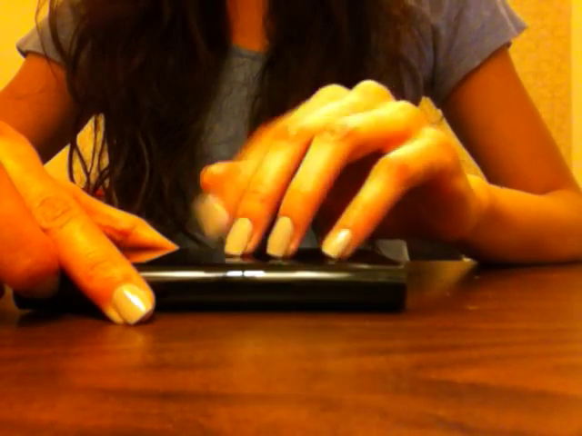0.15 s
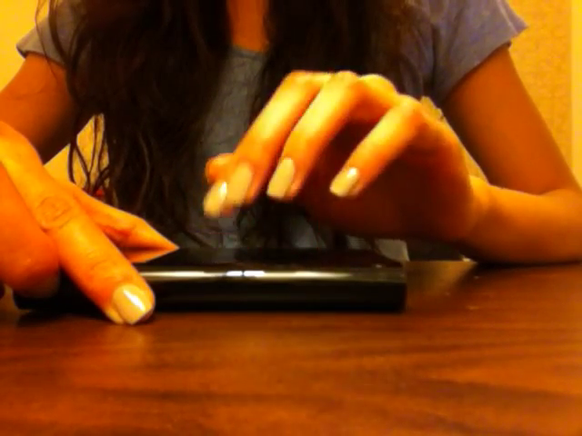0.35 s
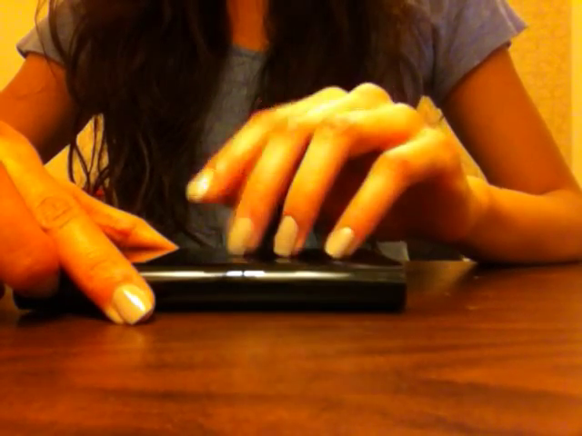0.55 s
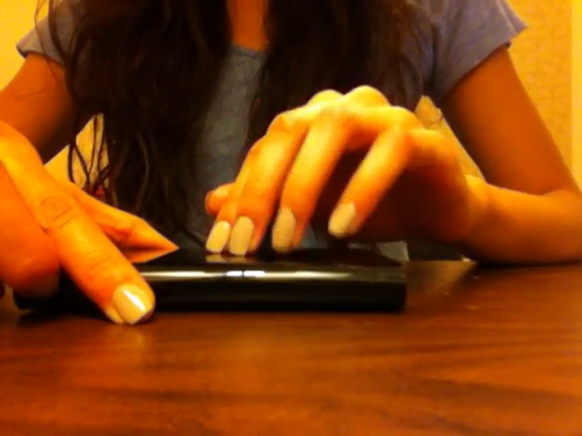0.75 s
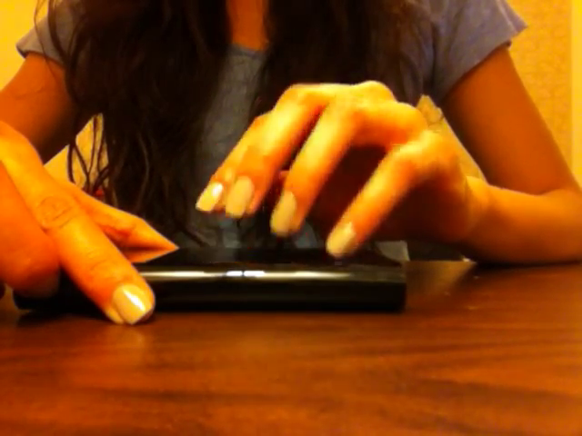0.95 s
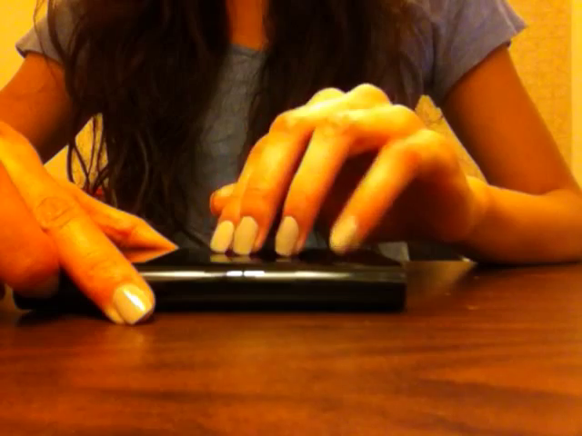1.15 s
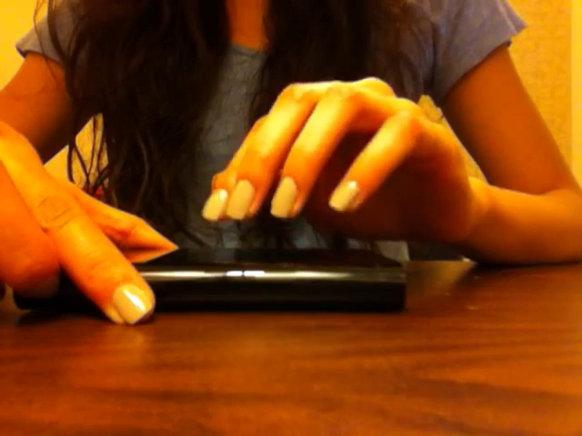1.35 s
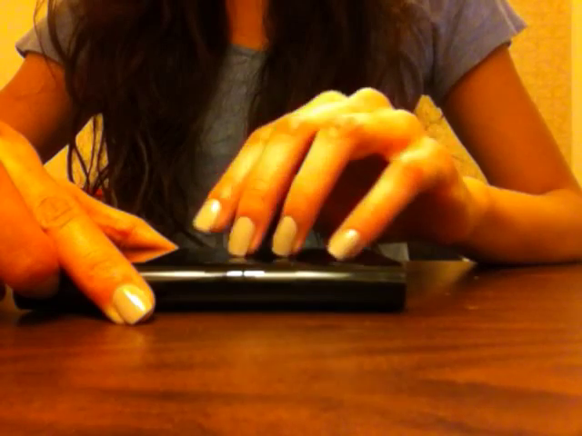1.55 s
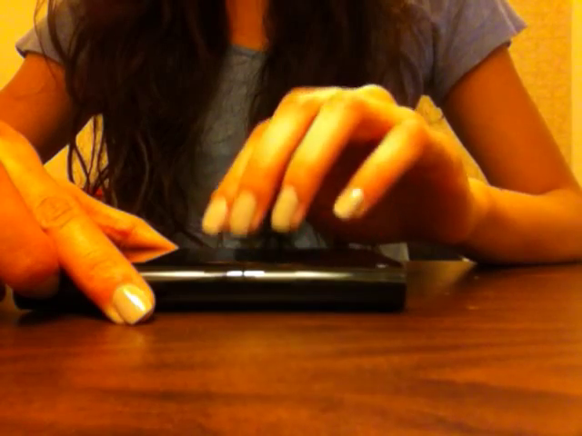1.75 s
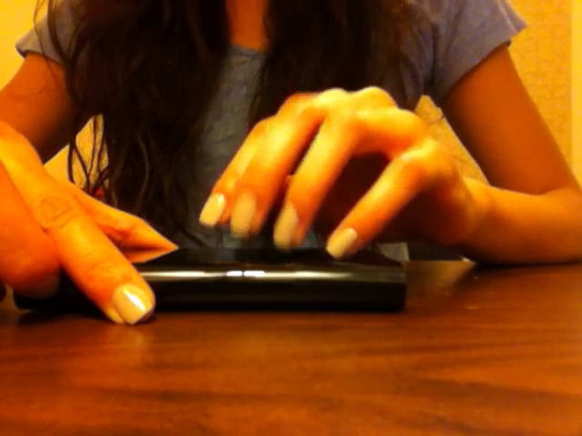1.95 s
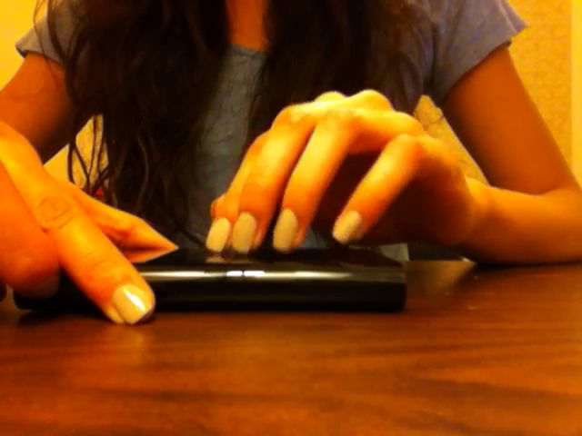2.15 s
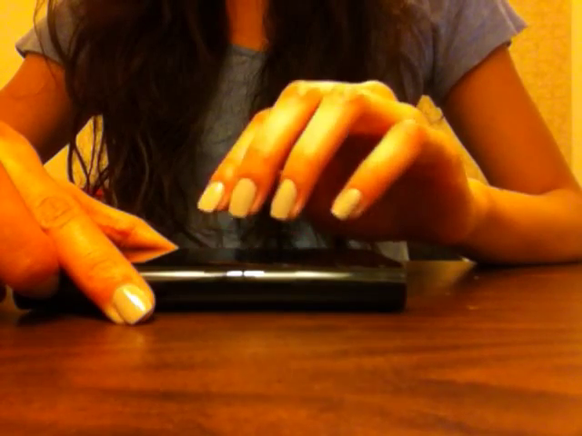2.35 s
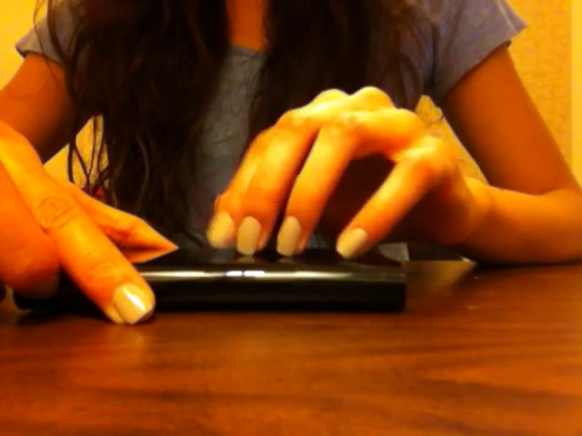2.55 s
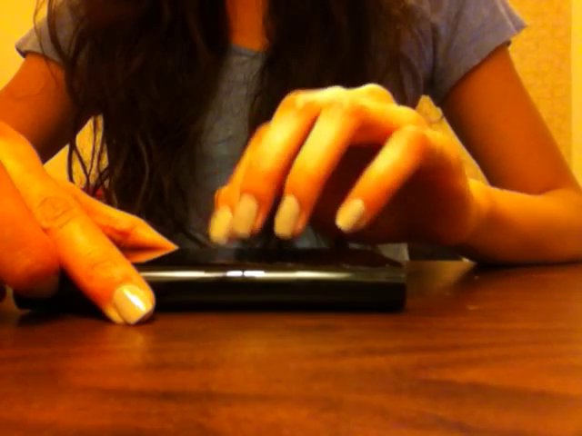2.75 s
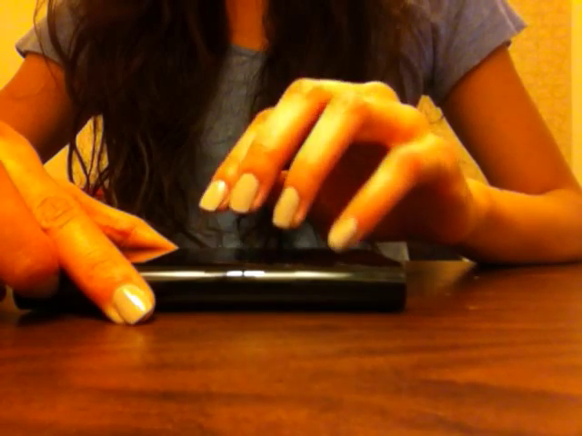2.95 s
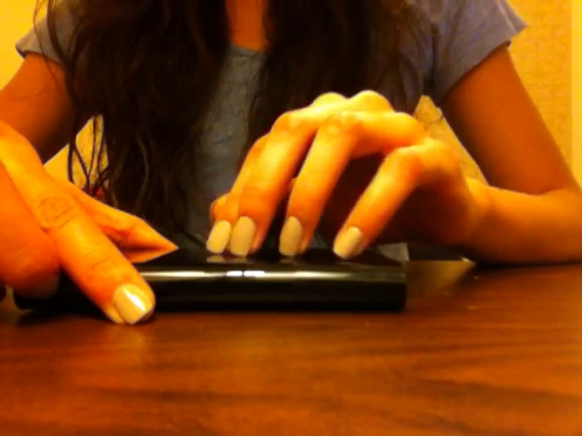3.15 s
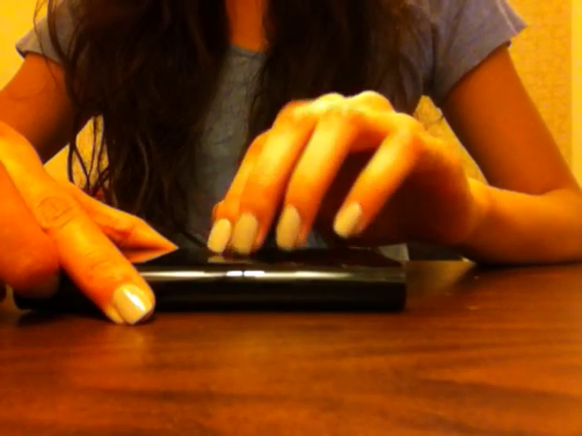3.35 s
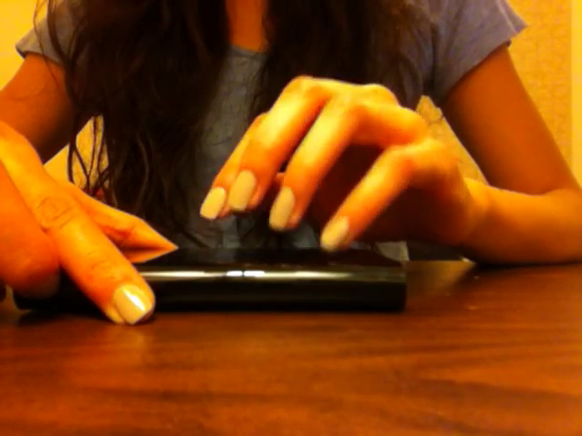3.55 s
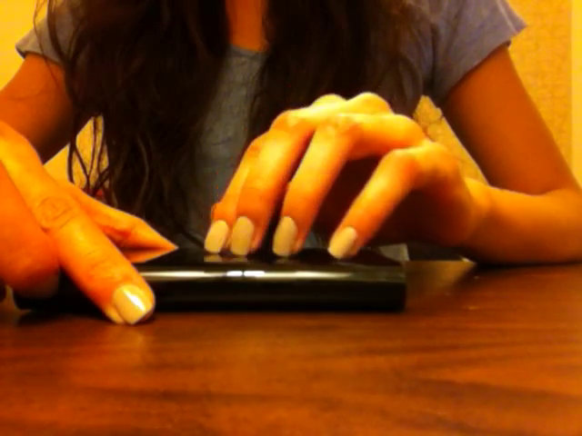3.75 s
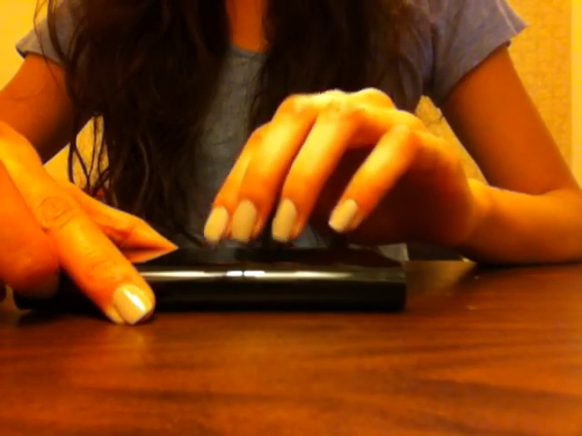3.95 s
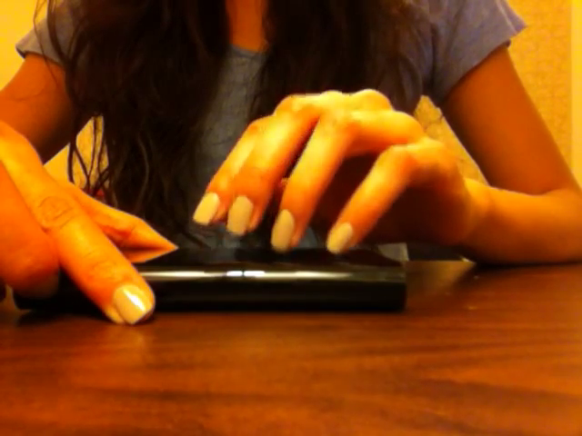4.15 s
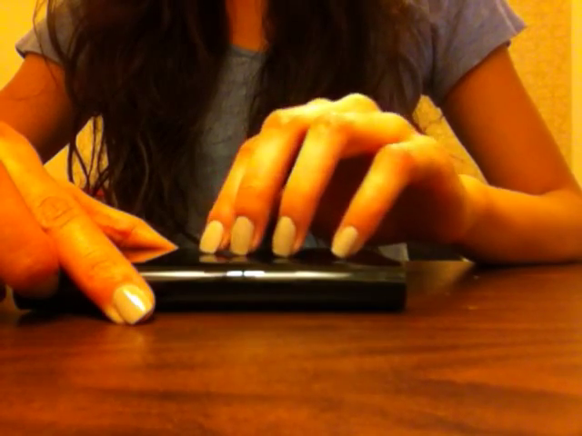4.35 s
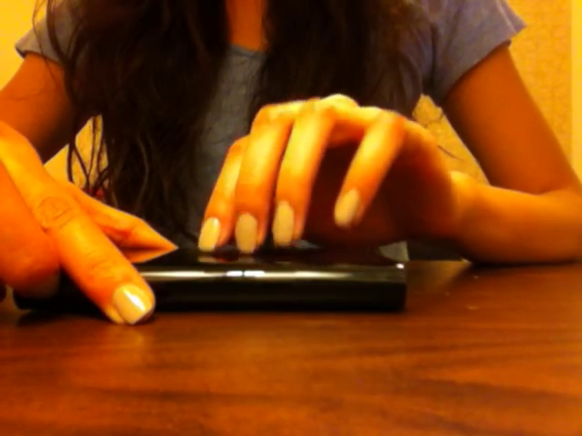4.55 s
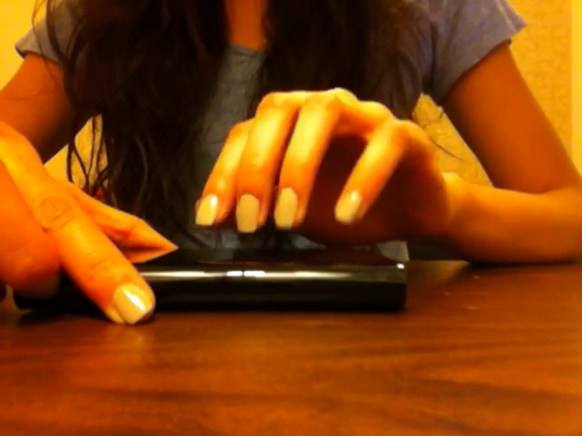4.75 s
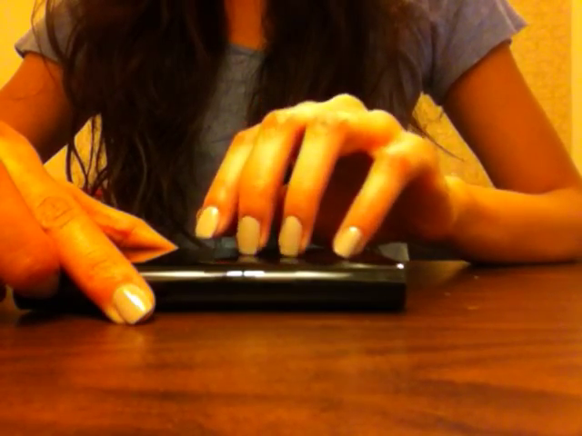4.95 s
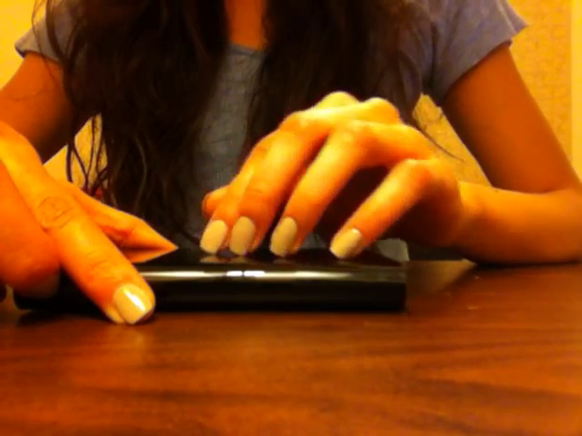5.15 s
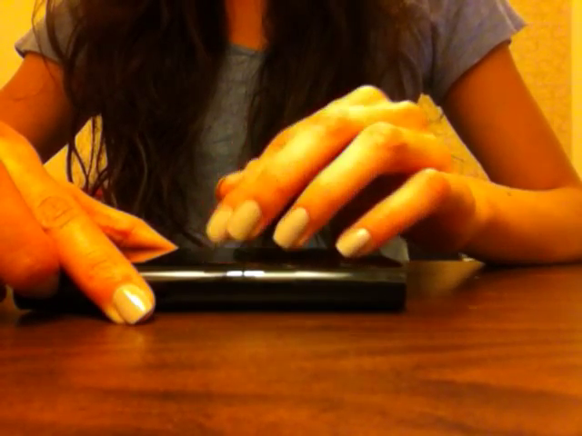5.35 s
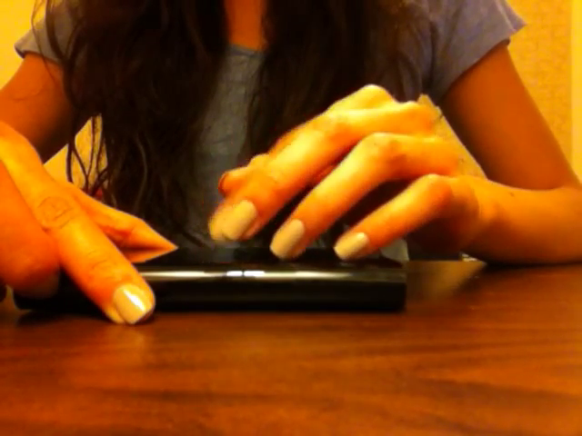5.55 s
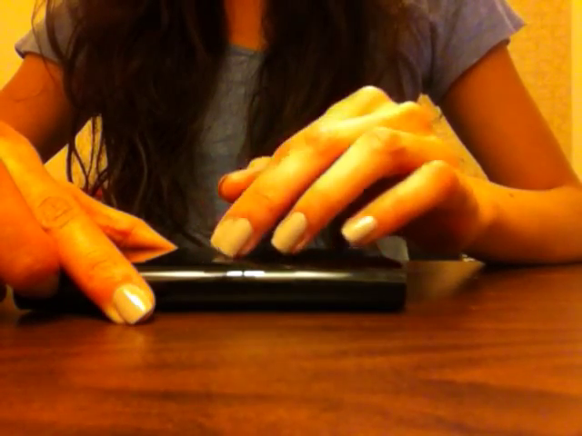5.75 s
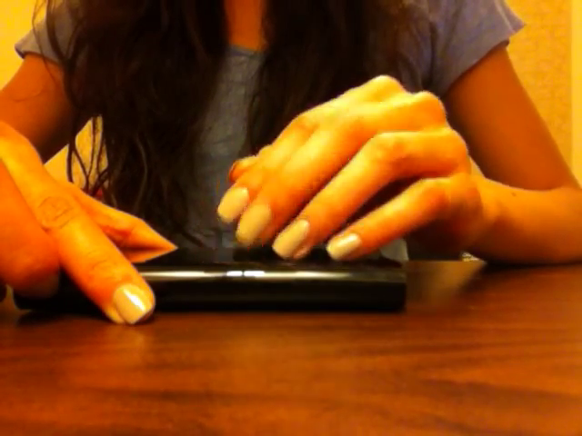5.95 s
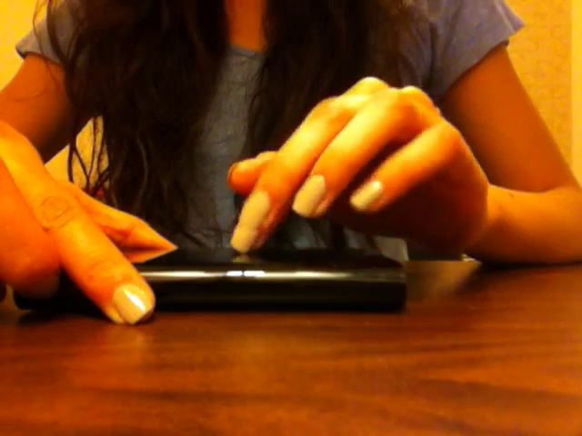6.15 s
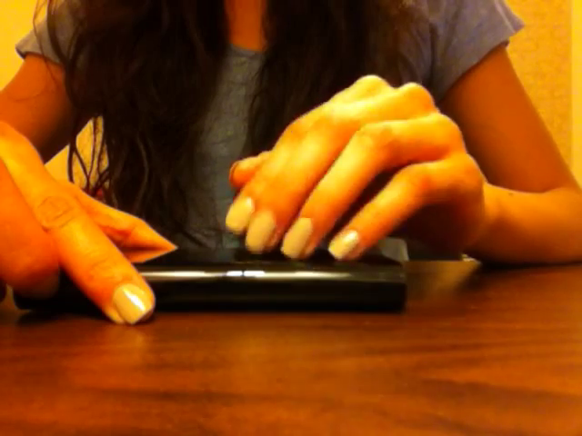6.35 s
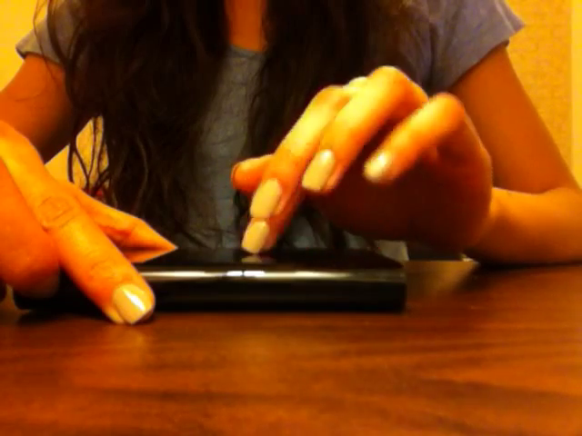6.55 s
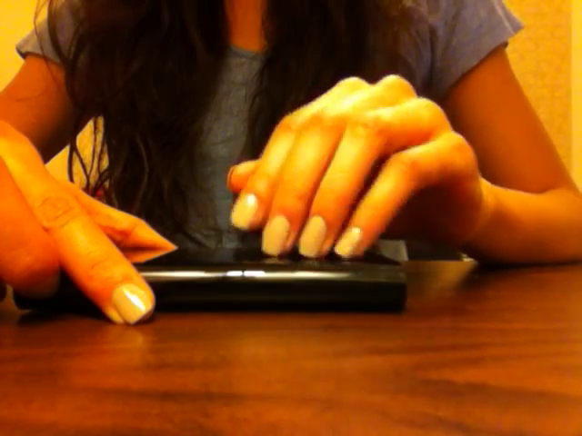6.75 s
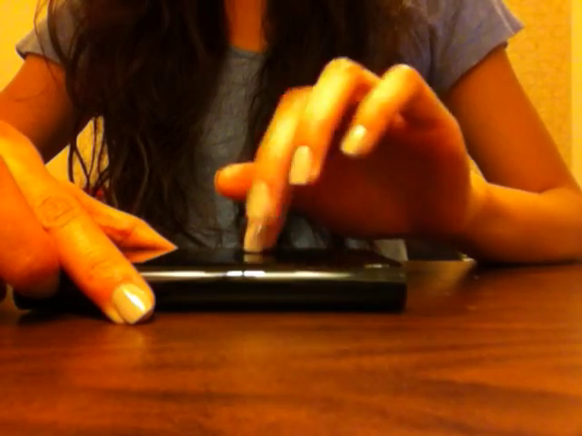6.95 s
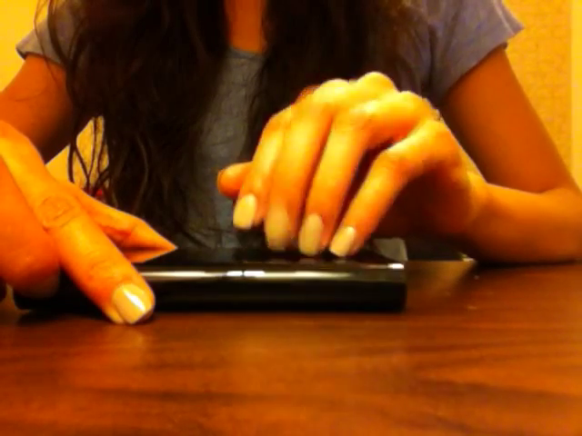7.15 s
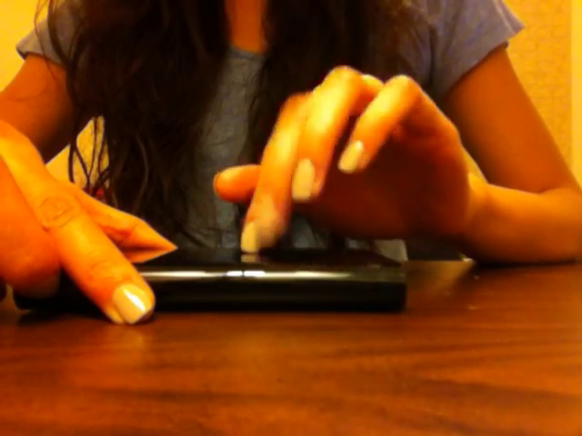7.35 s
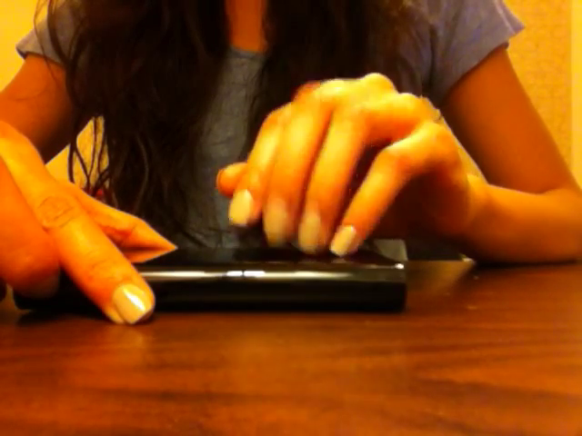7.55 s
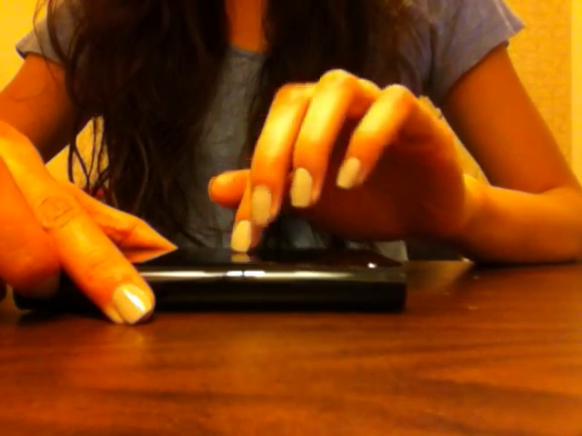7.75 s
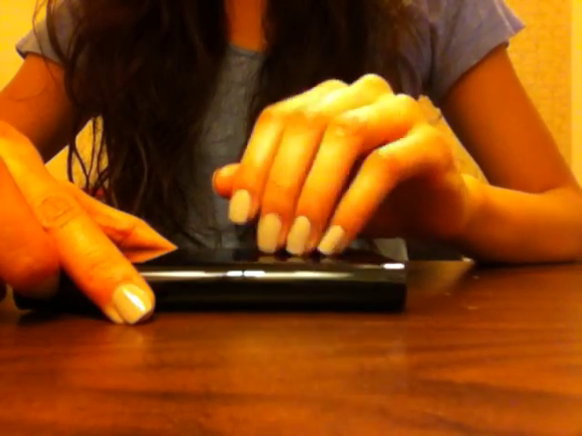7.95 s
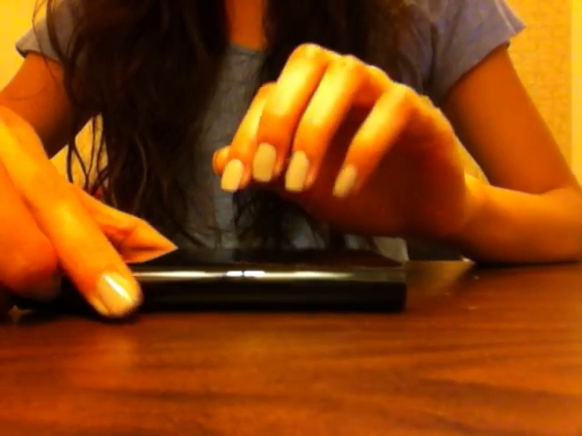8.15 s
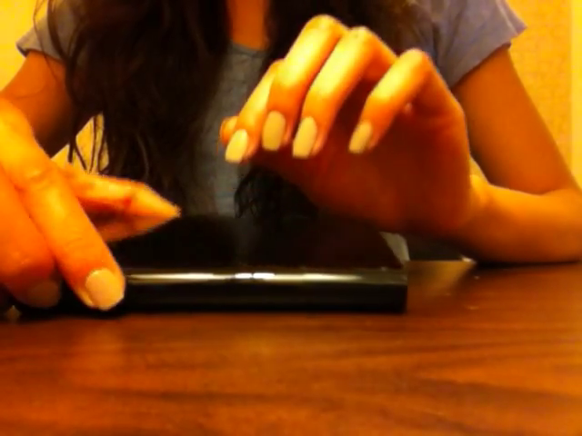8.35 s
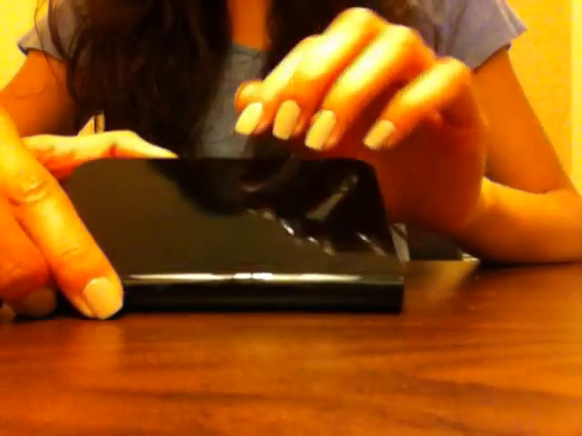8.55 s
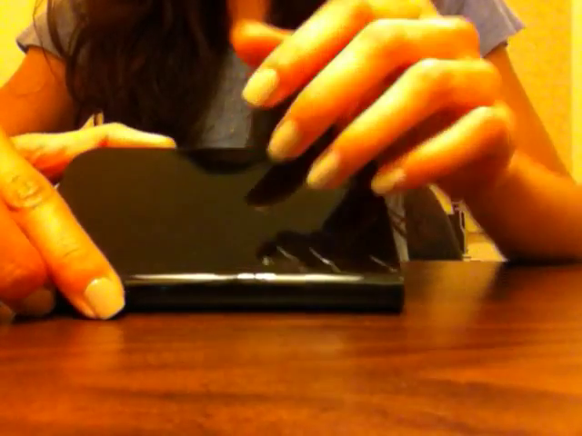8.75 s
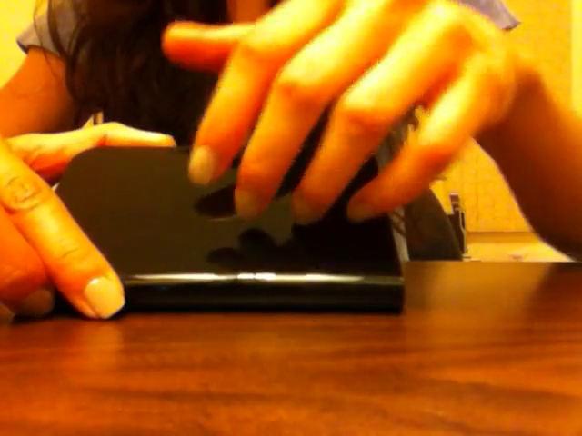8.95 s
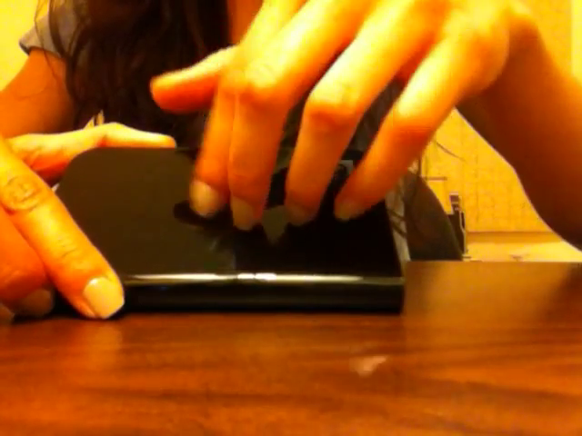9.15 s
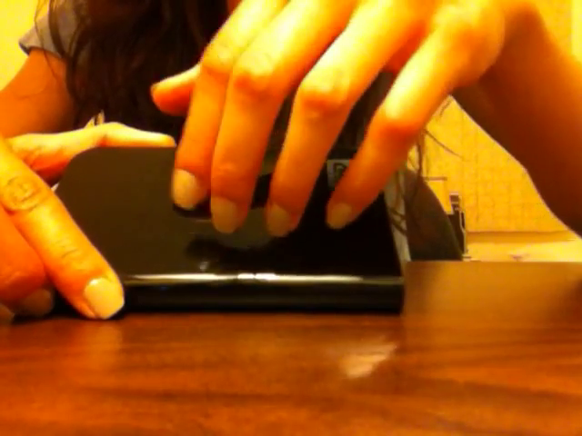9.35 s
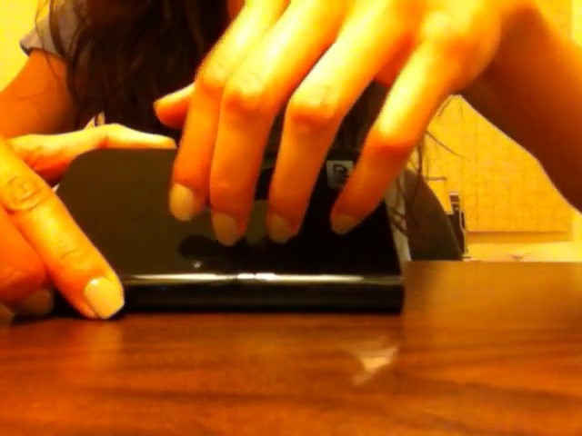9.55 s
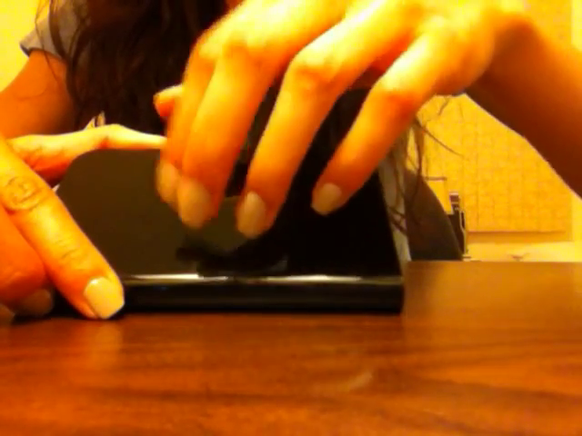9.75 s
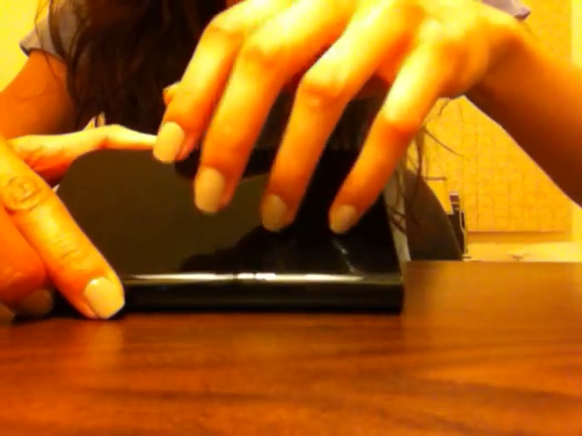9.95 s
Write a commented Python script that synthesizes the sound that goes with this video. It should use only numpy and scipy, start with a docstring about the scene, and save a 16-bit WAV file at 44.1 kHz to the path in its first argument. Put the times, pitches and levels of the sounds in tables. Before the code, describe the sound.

Fingernails tap a phone's glass in short, repeated bursts of sharp clicks and small knocks, over faint room hum and hiss.

```python
"""Fingernails drumming on a phone

Long nails drum in quick rolls, little finger first, on a phone lying on a wooden table in a small,
quiet room. Each nail hits its own spot and rings the phone's short modes in its own mix; near the end
the phone is tilted up and tapped again. Nearby surfaces throw back dull echoes, the room adds a brief
tail, and a faint bed of hum and hiss sits underneath."""
import sys
import numpy as np
from scipy import signal
from scipy.fft import rfft, irfft
from scipy.io import wavfile

SR = 44100
rng = np.random.default_rng(int(sys.argv[2]) if len(sys.argv) > 2 else 0)


def pcm_store(signal):
    """Save signal as 16-bit PCM."""
    levels = np.round(np.clip(np.atleast_2d(signal), -1, 1) * 32767)
    wavfile.write(sys.argv[1], SR, levels.astype(np.int16).T)


N = 440559
TIME = np.arange(N) / SR

# The colour of the rumble and hiss. Each row: frequency in Hz, relative spectral level in dB.
NOISE_COLOUR = [(11, -69), (18, -39), (48, -11.5), (91, -11), (108, -7.5), (182, -4), (265, -12),
                (297, 1.5), (333, -15), (374, -12), (630, -16), (817, -17), (1300, -21), (15100, -27.5),
                (18000, -39)]
# The steady hum. Each row: frequency in Hz, RMS level in dB.
HUM_TONES = [(118.4, -67.5), (300.5, -68.5)]
# The performance, tap by tap. Each row: start in seconds, stroke name, strength in dB.
NAIL_TAPS = [(.0198, "first", -8), (0.1037, "index", 2), (.437, "little", 17), (.4489, "ring", 19.5),
             (.4814, "middle", 22), (0.5751, "index", 7), (.8795, "little", 10.5), (0.9254, "ring", 13.5),
             (.9557, "middle", 20), (1.0632, "index", 11), (1.3814, "little", 13), (1.4065, "ring", 14.5),
             (1.446, "middle", 16.5), (1.5286, "index", 17), (1.868, "little", 4.5), (1.9315, "ring", 12),
             (1.9448, "middle", 21), (1.9909, "index", 13.5), (2.4103, "little", 9.5), (2.448, "ring", 11),
             (2.482, "middle", 16.5), (2.5298, "index", 12), (2.9372, "little", 6.5), (2.9994, "ring", 13),
             (3.0443, "middle", 13.5), (3.0981, "index", 17.5), (3.53, "little", 8), (3.607, "ring", -2.5),
             (3.6726, "middle", 14.5), (3.6947, "index", 12.5), (4.125, "little", 1), (4.1313, "ring", 6),
             (4.178, "middle", 12.5), (4.2568, "index", 11.5), (4.808, "little", 12), (4.8309, "ring", 1.5),
             (4.8977, "middle", 4.5), (5.0362, "index", 10.5), (5.4584, "soft", -9.5),
             (5.5364, "index", 15), (5.68, "middle", 14), (5.751, "soft", -0.5), (5.8295, "soft", 4),
             (6.059, "first", 17.5), (6.1546, "middle", 17.5), (6.2414, "third", 11), (6.47, "first", 21.5),
             (6.5663, "middle", 20.5), (6.6504, "third", 16), (6.6961, "soft", -7), (6.8687, "first", 19.5),
             (6.9493, "second", 16.5), (7.0302, "third", 16.5), (7.0669, "last", 16), (7.2666, "first", 21),
             (7.33, "second", 20.5), (7.416, "third", 20.5), (7.4524, "last", 18), (7.695, "first", 21.5),
             (7.7598, "second", 21.5), (7.85, "third", 20.5), (7.8942, "last", 15.5), (8.059, "rim", 1.5),
             (8.2011, "pad", 0.5), (8.891, "rim", 12), (8.9318, "glance", 5), (9.0397, "face", 16),
             (9.1224, "skim", 9), (9.3863, "rim", 7.5), (9.3982, "glance", 6.5), (9.42, "rim", 3.5),
             (9.5481, "face", 17.5), (9.891, "rim", 11)]
# How each named stroke lands. Each entry: spot number, fingertip thud in dB, contact hardness in dB.
# Spots 0-3 lie under the flat hand, little finger to index; 4-6 under the turned hand;
# 7 and 8 are on the tilted phone.
STROKE_TOUCH = {"little": (0, -4, -2.7), "ring": (1, 3.7, -4.7), "middle": (2, 2.9, -0.43),
                "index": (3, -.5, -2.1), "first": (4, 1.8, 0.79), "second": (6, 5.8, -1.8),
                "third": (5, 3.8, -3.5), "last": (5, -8, -4), "soft": (0, 3.4, 0), "rim": (7, -0.64, .5),
                "pad": (7, 9.9, -28), "glance": (7, -7, -1.5), "face": (8, -3, 0.87), "skim": (8, -10, 0)}
FIRST_TILTED_SPOT = 7
# The hand's changing firmness, adding both thud and click. Each row: time in seconds, firmness in dB.
HAND_FIRMNESS = [(.45, -3.5), (1, .3), (2, 1), (4.2, 0.5), (5.1, -0.5), (5.6, -4.5), (6.2, -1.5), (7.3, 1),
                 (7.9, .5), (8.06, -4.5), (8.9, 0), (9.4, 3), (9.55, -3)]
# The ring of the phone on the table. Each row: frequency in Hz, 60 dB decay time in seconds,
# then the mode's gain in dB when struck at each of spots 0 to 8.
PHONE_MODES = [(113, 0.01, -10, -8, -11.5, -12.5, -15, -8.5, -12, -22, -30),
               (252, 0.023, 2.5, 3, 1.5, -5.5, -3, 1, -1.5, -4.5, -1),
               (410, 0.019, -11, 0.5, 0.5, -4, -1.5, -4.5, -1.5, 2, 8.5),
               (700.3, 0.014, -10, 5.5, 6.5, 9.5, 9.5, -0.5, 7, 2.5, 12),
               (759.4, 0.0095, -15, 0.5, 2, 6.5, 6, -3, 2.5, -2.5, 5.5),
               (1028, 0.014, 9, 8, 0, 1.5, 5.5, 10, 7, 8, 3),
               (1052, 0.0063, 2.5, 1.5, -4.5, -7, -1, 2.5, 2.5, 1, 0),
               (1528, 0.021, -1, 0, -3.5, -3.5, 2.5, -1, 2, 1, -1.5),
               (1870, 0.011, -8, -8, -15.5, -16.5, -12.5, -6, -16, -6, -22),
               (2487, 0.018, -9, -8, -11.5, -12, -24.5, -7, -16, -11, -9.5),
               (3168, 0.018, -12.5, -8, -1.5, -7, -10.5, -9, -11, -13, -11.5),
               (3468, 0.016, -8, -3.5, 0.5, -11.5, -10, -6.5, -6.5, -8.5, -10),
               (4030, 0.015, -7.5, -7, -13, -6, -9, -13, -13, -16, -9.5),
               (4540, 0.0062, -11.5, -10, -8.5, -10, -11.5, -10.5, -11, -11.5, -13),
               (5015, 0.0039, -13, -12, -12, -15, -16, -10.5, -12.5, -17, -14),
               (5980, 0.0027, -16.5, -17, -23, -22, -22, -18.5, -19, -27, -22),
               (7630, 0.0015, -25.5, -27, -28, -26, -28, -22.5, -28.5, -33, -28.5),
               (10630, 0.0034, -30.5, -27, -31, -40, -31.5, -27.5, -31, -37, -29),
               (14478, 0.0013, -49, -44, -44, -52, -41, -42, -36, -49, -44)]
# Bounces off nearby surfaces. Each row: delay in seconds, signed gain before the low-pass.
NEAR_ECHOES = [(.0072, 0.15), (0.0103, 0.19), (0.0118, -0.12), (0.0134, 0.18), (.014, -0.05), (.0211, 0.11),
               (0.0232, -0.11)]
# The room's reverb. Each row: frequency in Hz, level against the send in dB, 60 dB decay time in seconds.
TAIL_BANDS = [(100, -3.5, 0.41), (296, -9, 0.21), (500, -3, 0.29), (685, -14.5, 0.2), (1090, -11.5, 0.22),
              (1560, -10.5, 0.4), (2380, -9, 0.16), (3360, -11.5, 0.16), (4940, -13.5, 0.33),
              (7900, -12.5, 0.26), (15000, -27, 0.18)]
# The room's standing waves. Each row: frequency in Hz, 60 dB decay time in seconds, peak gain in dB.
STANDING_WAVES = [(86, 0.41, 5.5), (114.6, 0.77, 8), (292, 0.2, -9.5), (450, 0.31, -4.5), (530, 0.22, -3),
                  (792, 0.15, 4.5), (1610, .22, -19)]
# A finger brushing the phone. Each row: centre in seconds, peak RMS level in dB, half-length in seconds.
FINGER_BRUSHES = [(8.136, -60, 0.0067), (8.715, -54, 0.027)]


def from_db(db):
    """Decibels to gain."""
    return 10 ** (np.asarray(db) / 20)


def unit_energy(x):
    """Scale to a total energy of one."""
    return x / np.sqrt(np.sum(x ** 2) + 1e-20)


def decay(t, t60):
    """Exponential fade, 60 dB down after t60 seconds."""
    return np.exp(-np.log(1000) * t / t60)


def butter(x, edge_hz, kind, order=2):
    """Causal Butterworth filter."""
    sections = signal.butter(order, np.clip(edge_hz, 10, SR * .45), kind, fs=SR, output="sos")
    return signal.sosfilt(sections, x)


def at_hz(table, hz, column=1):
    """Read one column of a table along a log-frequency axis."""
    table = np.array(table)
    return np.interp(np.log(np.maximum(hz, 1)), np.log(table[:, 0]), table[:, column])


def resonate(x, hz, t60):
    """Ring one damped mode, with unity gain at its peak."""
    radius = decay(1 / SR, t60)
    feedback = [1, -2 * radius * np.cos(2 * np.pi * hz / SR), radius ** 2]
    return signal.lfilter(np.array([1, 0, -1]) * (1 - radius ** 2) / 2, feedback, x)


def add(track, start_s, sound):
    """Mix a sound into a track at start_s."""
    start = max(round(start_s * SR), 0)
    track[start:start + len(sound)] += sound[:len(track) - start]


def room_tone(noise_db=-54, whine_hz=14993, whine_db=-78):
    """The bed: room rumble and microphone hiss, with a low hum and a thin electric whine."""
    colour = from_db(at_hz(NOISE_COLOUR, np.fft.rfftfreq(N, 1 / SR)))
    noise = unit_energy(irfft(rfft(rng.standard_normal(N)) * colour, N)) * np.sqrt(N)
    tones = sum(np.sqrt(2) * from_db(db) * np.sin(2 * np.pi * (hz * TIME + rng.random()))
                for hz, db in [*HUM_TONES, (whine_hz, whine_db)])
    return from_db(noise_db) * noise + tones


def finger_touch(start_s, stroke, strength_db, usual_db=14):
    """Spot, thud and hardness of a tap: a stronger one is more nail and less fingertip."""
    spot, thud_db, hard_db = STROKE_TOUCH[stroke]
    firm_db = np.interp(start_s, *np.transpose(HAND_FIRMNESS))
    accent_db = strength_db - usual_db
    thud_db = thud_db - 0.2 * accent_db + 1.05 * firm_db
    hard_db = hard_db + 0.03 * accent_db + firm_db
    return spot, thud_db, hard_db


def nail_contact(scuff_db=7.5, scuff_t60=0.02, scuff_hz=5400, blow_hz=11000, size=2048):
    """The attack: a sharp blow, then a few milliseconds of fine scuff as the nail skids on the glass."""
    t = np.arange(size) / SR
    blow = butter(signal.unit_impulse(size), blow_hz, "low", order=1)
    skid = unit_energy(rng.standard_normal(size) * decay(t, scuff_t60))
    return blow + from_db(scuff_db) * butter(skid, scuff_hz, "high", order=5)


def phone_knock(spot, thud_db, hard_db, thud_hz=900, hard_hz=1500, scatter_db=1.26, flex_db=6.5):
    """The body: the spot mixes the modes; fingertip weight feeds the lows, a hard contact the highs."""
    hz, t60, *spot_db = np.transpose(PHONE_MODES)
    low_weight = np.clip(np.log2(thud_hz / hz), 0, 1)
    high_weight = np.maximum(np.log2(hz / hard_hz) / 2, 0)
    mode_db = spot_db[spot] + thud_db * low_weight + hard_db * high_weight
    gains = from_db(mode_db + scatter_db * rng.standard_normal(len(hz)))
    force = nail_contact()
    # neighbouring modes swing in opposite directions
    knock = sum((-1) ** k * gains[k] * resonate(force, hz[k], t60[k]) for k in range(len(hz)))
    if spot >= FIRST_TILTED_SPOT:   # standing on one edge, the phone flexes with a longer low knock
        knock -= from_db(flex_db + thud_db) * resonate(force, hz=292, t60=0.049)
    return knock


def scattered_click(click_hz=4300, click_t60=0.00052, top_hz=8000, spread_t60=0.047, size=2048):
    """Heard from all directions at once, the high modes blur into one broad click, new on every tap."""
    t = np.arange(size) / SR
    burst = unit_energy(rng.standard_normal(size) * decay(t, spread_t60))
    return butter(resonate(burst, click_hz, click_t60), top_hz, "low", order=1)


def drumming(click_db=-14.0, hard_share=0.23, low_cut_hz=50):
    """Play every tap onto two tracks: the direct knocks, and the clicks thrown into the room."""
    knocks, clicks = np.full((2, N), 1e-18)
    for start_s, stroke, strength_db in NAIL_TAPS:
        spot, thud_db, hard_db = finger_touch(start_s, stroke, strength_db)
        add(knocks, start_s, from_db(strength_db) * phone_knock(spot, thud_db, hard_db))
        add(clicks, start_s, from_db(strength_db + click_db + hard_share * hard_db) * scattered_click())
    return butter(knocks, low_cut_hz, "high"), clicks   # a small body radiates little deep bass


def room_boom(knocks):
    """Each knock sets the room's standing waves ringing."""
    return sum(from_db(db) * resonate(knocks + 1e-18, hz, t60) for hz, t60, db in STANDING_WAVES)


def early_echoes(knocks, dull_hz=680, wall_delay_s=0.0243, wall_db=-25, size=2048):
    """Close surfaces return only the low knock; one hard wall slaps back the whole tap."""
    response = np.zeros(size)
    for delay_s, gain in NEAR_ECHOES:
        add(response, delay_s, np.array([gain]))
    response = butter(response, dull_hz, "low", order=3)
    add(response, wall_delay_s, from_db([wall_db]))
    return signal.fftconvolve(knocks, response)[:N]


def room_tail(send, predelay_s=0.0026, build_up_s=0.0015, bands=18):
    """Diffuse reflections swell after a short gap and die away band by band."""
    t = np.arange(SR // 2) / SR
    swell = 1 - np.exp(-np.maximum(t - predelay_s, 0) / build_up_s)
    edges_hz = np.geomspace(60, 18000, bands + 1)
    response = np.zeros(len(t))
    for low, high in zip(edges_hz, edges_hz[1:]):
        centre_hz = np.sqrt(low * high)
        noise = butter(rng.standard_normal(len(t)), [low, high], "band")
        band = unit_energy(noise * swell * decay(t, at_hz(TAIL_BANDS, centre_hz, column=2)))
        spectrum_share = 2 * (high - low) / SR
        response += from_db(at_hz(TAIL_BANDS, centre_hz)) * np.sqrt(spectrum_share) * band
    return signal.fftconvolve(send, response)[:N]


def finger_brush(band_hz=(1400, 2800)):
    """Skin slides softly over the case as the phone is raised."""
    friction = unit_energy(butter(rng.standard_normal(N), band_hz, "band", order=1)) * np.sqrt(N)
    swells = sum(from_db(db) * np.exp(-((TIME - centre_s) / half_s) ** 2)
                 for centre_s, db, half_s in FINGER_BRUSHES)
    return friction * swells


def scene(send_top_hz=2000):
    """The mono mix: the taps, the room's answer and the finger brushes, over the room tone."""
    knocks, clicks = drumming()
    send = butter(knocks, send_top_hz, "low", order=3) + clicks   # the low knock spreads evenly all round
    room = room_boom(knocks) + early_echoes(knocks) + room_tail(send)
    return (knocks + room + finger_brush() + room_tone())[None]


def record(dry, ceiling=0.84, cutoff_hz=17800):
    """Soft saturation rounds the sharpest peaks, then a steep low-pass trims the very top."""
    rounded = ceiling * np.tanh(dry / ceiling)
    return signal.sosfilt(signal.ellip(8, .2, 70, cutoff_hz, fs=SR, output="sos"), rounded)


dry = scene()
out = record(dry)
pcm_store(out)
```